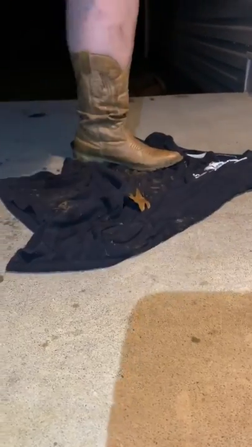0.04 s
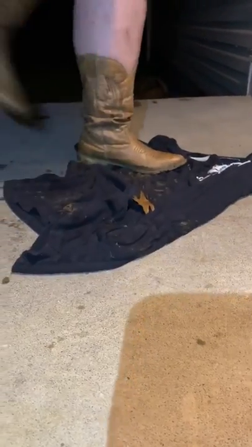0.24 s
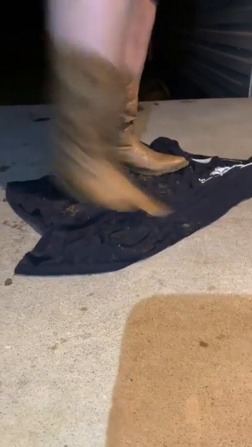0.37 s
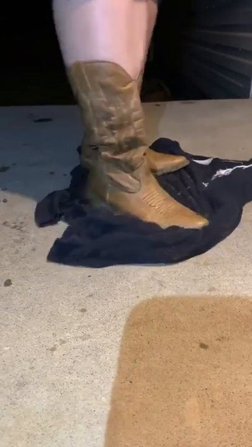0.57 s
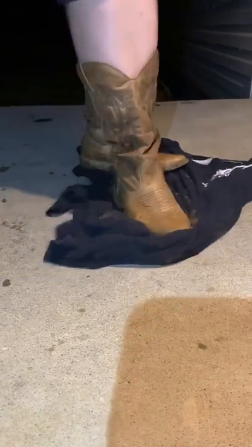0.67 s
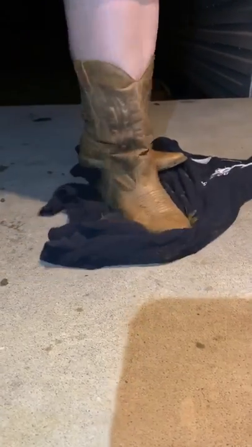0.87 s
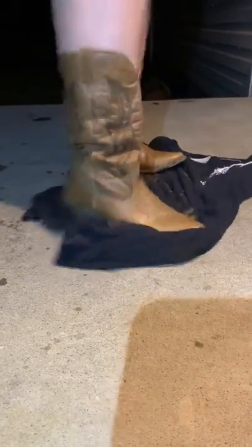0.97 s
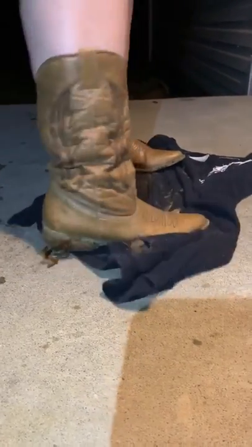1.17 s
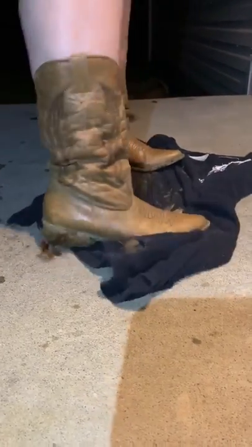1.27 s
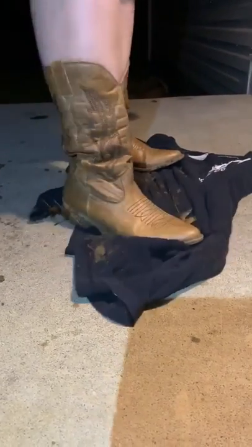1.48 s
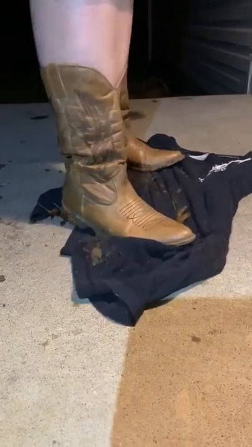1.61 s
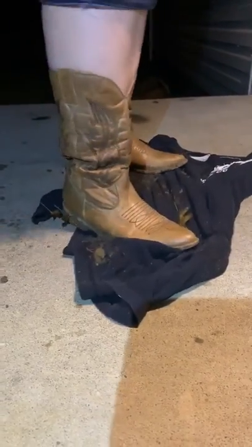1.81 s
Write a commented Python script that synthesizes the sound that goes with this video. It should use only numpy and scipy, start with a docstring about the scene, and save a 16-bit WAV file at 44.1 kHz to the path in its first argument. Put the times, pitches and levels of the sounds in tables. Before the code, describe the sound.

Close to the microphone, a boot heel thuds through cloth onto a concrete slab. A few rubbing strokes follow as the boot drags the fabric around, while crickets and fainter insects trill outdoors at night.

```python
"""Outdoors at night, on a concrete slab. Crickets trill all around by rubbing their wings, over fainter
insects, a murmur of air and a low, wavering hum. Close by, cloth rustles as a leg swings in, and a
leather boot steps onto a shirt on the slab: it ticks, the heel thuds and the sole crushes the cloth.
The shirt settles, then the boot wipes it to and fro in a few rubbing, hissing strokes, coloured by
reflections from nearby walls. A close pair of microphone ports hears it all."""
import sys
import numpy as np
from scipy import signal
from scipy.fft import rfft, irfft, next_fast_len
from scipy.io import wavfile
from scipy.ndimage import map_coordinates

SR = 44100
rng = np.random.default_rng(int(sys.argv[2]) if len(sys.argv) > 2 else 0)


def put_to_file(sound):
    """Save the sound as 16-bit audio at rate SR, in the file named by the first command-line argument."""
    columns = np.atleast_2d(sound).T  # one column per channel
    safe = np.clip(columns, -1, 1)
    whole_steps = np.round(safe * 32767)
    wavfile.write(sys.argv[1], SR, whole_steps.astype(np.int16))


N = 81585


def amp(db):
    """Turn decibels into a number to multiply by."""
    return 10 ** (np.asarray(db) / 20)


def unit(x):
    """Scale a sound to an average strength (rms) of 1."""
    return x / np.sqrt(np.mean(x ** 2) + 1e-20)


def clock():
    """The time of every sample, in seconds."""
    return np.arange(N) / SR


def along(points, hz):
    """Read between (Hz, value) rows, giving each octave equal room."""
    pitches, values = np.transpose(points)
    return np.interp(np.log(np.maximum(hz, 1e-6)), np.log(pitches), values)


def level(rows):
    """Join (seconds, dB) rows into a volume curve."""
    return amp(np.interp(clock(), *np.transpose(rows)))


def wobble(rate):
    """A smooth curve through `rate` random values a second."""
    return map_coordinates(rng.standard_normal(256), [clock() * rate], mode="wrap")


def filtered(x, response):
    """Multiply each frequency in a sound by response(Hz)."""
    size = next_fast_len(N + SR // 2)
    return irfft(rfft(x, size) * response(np.fft.rfftfreq(size, 1 / SR)), size)[..., :N]


def white():
    """Two unrelated noises."""
    return rng.standard_normal((2, N))


def coloured(pair, colour, alike, pitch=1):
    """Make two signals a stereo sound of strength 1. Colour is its balance of low and high;
    alike is how well left and right match (1 the same, 0 unrelated, -1 or less opposite)."""
    def response(hz):
        spread = np.arccos(np.clip(along(alike, hz), -1, 1)) / 2
        return amp(along(colour, hz / pitch)) * [np.cos(spread), np.sin(spread)]
    middle, side = filtered(pair, response)
    return unit(np.array([middle + side, middle - side]))


def struck(start, attack, t60):
    """A quick rise, then a fade of 60 dB every t60 seconds."""
    age = np.maximum(clock() - start, 0)
    return (1 - np.exp(-age / attack)) * amp(-60 * age / t60)


# Each row: frequency in Hz, head start of the left port in milliseconds (below 0 it lags).
LEFT_LEAD = [(300, 0.13), (900, -0.063), (2200, 0.087), (7000, 0.12)]
def left_first(x):
    """Most of the sound reaches the left port slightly earlier."""
    sides = np.array([[1], [-1]])
    return filtered(x, lambda hz: np.exp(1j * np.pi * hz * along(LEFT_LEAD, hz) / 1000 * sides))


# The air's loudness. Each row: time in seconds, level in dB.
AIR_LEVEL = [(0, -65), (.2, -60.5), (.36, -59), (.62, -59.5), (.88, -64), (1.33, -63.5), (1.6, -62.5),
             (1.85, -62.5)]
# Its colour. Each row: frequency in Hz, relative level in dB.
AIR_COLOUR = [(15, -12.5), (35, 5), (100, 3), (160, -1.5), (260, -4), (550, -13), (1000, -14),
              (1600, -15.5), (3200, -27.5), (8000, -98), (16000, -54)]
# Each row: frequency in Hz, left-right match.
AIR_MATCH = [(100, 0.99), (300, 0.78), (700, 0), (1400, 0.32), (3000, 0.041)]
def air():
    """The night air murmurs low."""
    return level(AIR_LEVEL) * coloured(white(), AIR_COLOUR, AIR_MATCH)


# The hum's loudness. Each row: time in seconds, level in dB.
HUM_LEVEL = [(0, -60), (.4, -82), (.66, -59), (.97, -61), (1.1, -70), (1.42, -72), (1.51, -58.5),
             (1.73, -59), (1.85, -70)]
def hum(hz=58.8):
    """One deep note wavers, fades and comes back."""
    return level(HUM_LEVEL) * unit(np.sin(2 * np.pi * hz * clock() + 0.26 * wobble(7.0)))


# The colours of three insect choirs. Each row: frequency in Hz, relative level in dB.
FAR_CRICKET_COLOUR = [(3000, -74), (3550, -24), (3880, -4.5), (4100, 1), (4400, -5.5), (4620, -14),
                      (4950, -13), (5280, -12.5), (5650, -15.5), (6000, -78.5)]
LOW_INSECT_COLOUR = [(1400, -63.5), (1750, -9), (1930, 3), (2200, -1.5), (2480, 3.5), (2900, -8.5),
                     (3600, -11.5), (5000, -30.5)]
HIGH_INSECT_COLOUR = [(5000, -42.5), (5850, 1), (6250, 9), (7100, 9.5), (8100, -1.5), (9000, -19.5),
                      (10200, -7), (11500, -52), (14000, -6.5), (16000, -26)]
# Each row: frequency in Hz, left-right match.
INSECT_MATCH = [(1900, 0.73), (2450, -0.29), (3100, -0.15), (3900, 0.93), (4350, 0.91), (4900, -0.71),
                (5400, -0.75), (6000, -1.4)]
def far_insects():
    """Many distant calls blur into bands of noise; the low and high bands flutter a little."""
    middle = amp(-51.5) * coloured(white(), FAR_CRICKET_COLOUR, INSECT_MATCH)
    low = amp(-64 + 0.53 * wobble(17)) * coloured(white(), LOW_INSECT_COLOUR, INSECT_MATCH)
    high = amp(-66.5 + wobble(23)) * left_first(coloured(white(), HIGH_INSECT_COLOUR, [(7000, 0.85)]))
    return middle + low + high


# One insect per row. Each row: pitch in Hz, level in dB.
THIN_NOTES = [(4640, -75), (4965, -76.5), (5215, -71.5), (5388, -75.5)]
def thin_trills(waver_hz=12, swell_db=6):
    """A few distant insects each hold one high, wavering note that fades in and out."""
    out = np.zeros((2, N))
    for hz, db in THIN_NOTES:
        phase = 2 * np.pi * np.cumsum(hz + waver_hz * wobble(30)) / SR
        for port in out:
            swell = amp(swell_db * wobble(14))
            port += amp(db) * unit(swell * np.sin(phase + wobble(7.9)))
    return out


# One cricket per row. Each row: pitch in Hz, relative level in dB, wing strokes per second.
NEAR_CRICKETS = [(3916, -9, 34), (4010, -7, 40), (4080, -3, 39), (4060, 2.5, 39.5), (4325, -15.5, 43),
                 (4270, -9, 36)]
# Together they swell and ebb. Each row: time in seconds, level in dB before boost_db is added.
CRICKET_SWELL = [(0, -54.5), (.22, -51.5), (.33, -55.5), (.6, -53), (1, -52.5), (1.3, -50.5), (1.43, -59),
                 (1.55, -53.5), (1.85, -56)]
def crickets(boost_db=2, sag_hz=57.6, drift_hz=14, swell_db=2.5, direct_db=-4.5, echo_seconds=0.17):
    """Each cricket trills on its own pitch, which sags in every wing stroke; the yard echoes it."""
    t, out = clock(), np.zeros((2, N))
    echo_fade = amp(-60 * t[:SR // 2] / echo_seconds)
    for pitch, db, strokes in NEAR_CRICKETS:
        wing = (strokes * t + rng.random() + 0.15 * wobble(11.14)) % 1  # 0 to 1 in each uneven stroke
        hz = pitch - sag_hz * (wing - .5) + drift_hz * wobble(8)
        pulses = np.sin(np.pi * wing) ** 4
        trill = pulses * np.sin(2 * np.pi * np.cumsum(hz) / SR)
        yard = echo_fade * rng.standard_normal((2, len(echo_fade)))
        echo = signal.fftconvolve(trill[None], yard, axes=1)[:, :N]
        middle = unit(unit(echo[0]) + amp(direct_db) * unit(trill))
        out += amp(db + swell_db * wobble(7.52)) * np.array([middle, unit(echo[1])])
    all_around = coloured(out, colour=[(4115, 0)], alike=[(4115, 0.1)])  # same tone, spread wide
    return amp(boost_db) * level(CRICKET_SWELL) * all_around


def grit(clicks_per_second=3000, share=0.51, spread_db=3):
    """Fibres and sand grains catch: dense, uneven clicks on top of smooth noise."""
    clicks = (rng.random((2, N)) < clicks_per_second / SR) * np.sign(white())
    sizes = amp(spread_db * np.minimum(rng.exponential(size=(2, N)), 4))
    return np.sqrt(share) * unit(clicks * sizes) + np.sqrt(1 - share) * white()


# What the walls add. Each row: pitch in Hz, width in Hz, level in dB against the plain sound.
WALL_PEAKS = [(573, 99, -0.5), (685, 19, -1.5), (791, 11, -2), (877.5, 11, 1.5), (1033, 33, -8.5),
              (1313, 14, 5), (1382, 6.5, -11), (2920, 18, -13)]
def walls(x):
    """Reflections from nearby walls colour the crunch and rubbing at a few fixed pitches."""
    return filtered(x, lambda f: 1 + sum(amp(db) * 1j * f * width / (hz * hz - f * f + 1j * f * width)
                                         for hz, width, db in WALL_PEAKS))


TOUCH_S, HEEL_S = .4795, .4955  # seconds: the boot first touches, then the heel takes the weight
# For boot and cloth. Each row: frequency in Hz, left-right match.
CLOSE_MATCH = [(200, 0.96), (1200, 0.99), (2100, 1), (4500, 0.59), (7000, 1), (14000, 0.89)]
# The colour of the first touch. Each row: frequency in Hz, relative level in dB.
TOUCH_COLOUR = [(150, -13), (320, 8), (600, -7), (1200, 13.5), (3000, -17), (5600, -3), (7200, 6.5),
                (10000, -13), (15000, -5.5)]
def tick():
    """The boot ticks as it first meets the slab."""
    return amp(-30) * struck(TOUCH_S, 0.0012, t60=.011) * coloured(white(), TOUCH_COLOUR, CLOSE_MATCH)


# The notes the heel rings with. Each row: pitch in Hz, level in dB, seconds to fade by 60 dB.
HEEL_NOTES = [(52, -44.5, 0.55), (79, -23, 0.096), (106.4, -30, 0.25), (178.7, -21.5, 0.073),
              (232, -18, 0.046), (284.7, -12.5, 0.03), (314, -29.5, 0.062), (558.3, -26.5, 0.046),
              (764, -27, 0.038), (1044, -27, 0.026), (1169, -25.5, 0.028), (1818, -35, 0.035),
              (2810, -46, 0.25)]
# The colour of its slap. Each row: frequency in Hz, relative level in dB.
HEEL_SLAP_COLOUR = [(70, -25), (250, -15), (400, -24), (520, -25), (1200, 34), (1750, -17), (3000, 6),
                    (8000, -31), (15000, -58)]
def heel(tap_db=-20, attack=.004):
    """The heel taps lightly, then thuds through the cloth with a short slap."""
    thud = np.zeros(N)
    for start, force_db in [(TOUCH_S, tap_db), (HEEL_S, 0)]:
        for hz, db, t60 in HEEL_NOTES:
            note = np.sin(2 * np.pi * hz * (clock() - start))
            thud += amp(force_db + db) * struck(start, attack, t60) * note
    slap = struck(HEEL_S, attack, t60=0.014) * coloured(white(), HEEL_SLAP_COLOUR, CLOSE_MATCH)
    return thud + amp(-33.5) * slap


# The crunch of the cloth. Each row: time in seconds, level in dB before the walls add to it.
CRUNCH_LEVEL = [(.473, -70.5), (.478, -51), (.49, -51.5), (.496, -38), (.524, -41.5), (.543, -42.5),
                (.549, -44), (.554, -56.5), (.62, -71)]
# Its colour. Each row: frequency in Hz, relative level in dB.
CRUNCH_COLOUR = [(100, 3.5), (310, -6.5), (430, -9), (800, -6.5), (1500, -7.5), (2200, -4.5), (3500, -12.5),
                 (4800, -4.5), (5700, -17.5), (7500, -15), (10000, -23), (11800, -67.5), (13500, -22.5),
                 (15500, -32)]
def crush():
    """The sole rolls down, crushes the cloth flat and stops short."""
    return walls(level(CRUNCH_LEVEL) * coloured(grit(), CRUNCH_COLOUR, CLOSE_MATCH))


# The leg swings in, the shirt settles, then the boot wipes. Each row: fastest moment, rise and fall
# in seconds, rub level in dB, rub pitch in Hz, hiss in dB against the rub, hiss tilt in dB per octave.
CLOTH_MOVES = [(.36, .13, 0.099, -72, 512, 4.5, -5), (0.566, 0.022, 0.048, -65, 890, -2, 5),
               (0.714, 0.038, 0.074, -55, 1110, -8.5, 0), (1.12, 0.13, 0.063, -54.5, 715, -4, 2),
               (1.175, 0.1, 0.057, -56, 920, -7.5, 6), (1.427, 0.027, .049, -46, 860, -10, 2.5),
               (1.478, 0.1, .08, -53.5, 950, -1, 0.1), (1.653, 0.04, 0.06, -63, 940, -3, -1.5)]
# The rub's colour. Each row: multiple of the rub pitch, relative level in dB.
CLOTH_RUB_COLOUR = [(.15, -9), (.3, -5.5), (.5, -8.5), (.75, -2), (1, -1.5), (1.4, -6.5), (2, -8.5),
                    (2.8, -11), (4.5, -6.5), (8, -45)]
# The hiss's colour. Each row: frequency in Hz, relative level in dB.
FIBRE_HISS_COLOUR = [(900, -14), (2100, 11), (3200, -7), (4700, -31), (5700, 0.5), (6600, 3.5), (8500, 2),
                     (10000, -8.5), (11600, -53), (13300, -3), (16000, -13)]
def rustles_and_wipes(judder_db=0.7, judder_rate=70, flatness=2.64):
    """Cloth rustles and wipes: a rub and a hiss of fibres swell with the speed of each move."""
    out = np.zeros((2, N))
    for fastest, rise, fall, db, pitch, hiss_db, tilt_db in CLOTH_MOVES:
        t = clock() - fastest
        speed = np.exp(-np.abs(t / np.where(t < 0, rise, fall)) ** flatness)  # a rounded hump
        rub = coloured(grit(), CLOTH_RUB_COLOUR, CLOSE_MATCH, pitch)
        tilted = [(hz, band_db + tilt_db * np.log2(hz / 5000)) for hz, band_db in FIBRE_HISS_COLOUR]
        hiss = coloured(grit(), tilted, CLOSE_MATCH)
        out += speed * amp(db + judder_db * wobble(judder_rate)) * (rub + amp(hiss_db) * hiss)
    return walls(out)


def scene():
    """Boot and cloth close by, the night all around."""
    close = left_first(tick() + heel() + crush() + rustles_and_wipes())
    return close + crickets() + thin_trills() + far_insects() + air() + hum()


def record(dry):
    """The microphone sheds the deepest bass and keeps nothing above 15720 Hz."""
    bass_cut = signal.butter(2, 25, "highpass", fs=SR, output="sos")
    return filtered(signal.sosfilt(bass_cut, dry), lambda hz: hz < 15720)


dry = scene()
out = record(dry)
put_to_file(out)
```